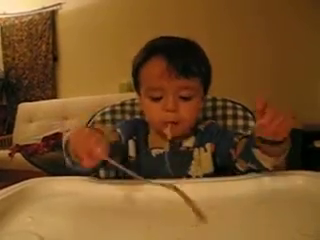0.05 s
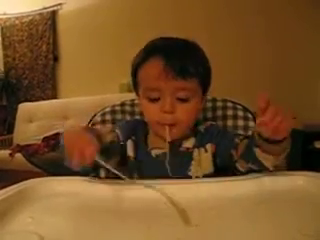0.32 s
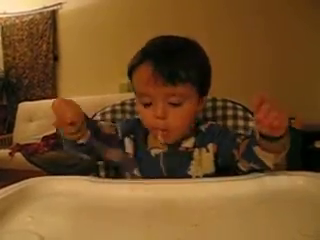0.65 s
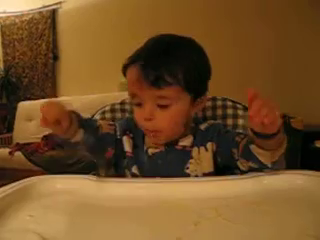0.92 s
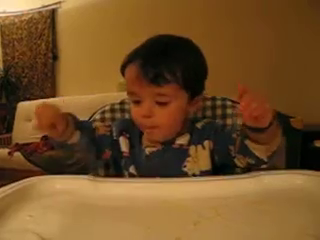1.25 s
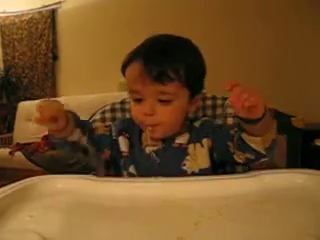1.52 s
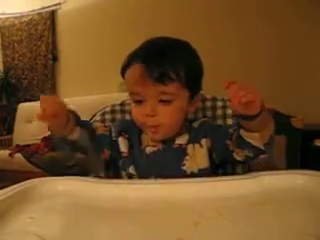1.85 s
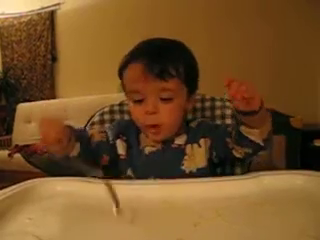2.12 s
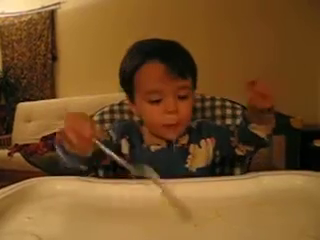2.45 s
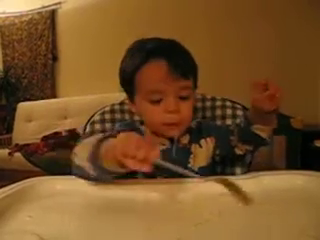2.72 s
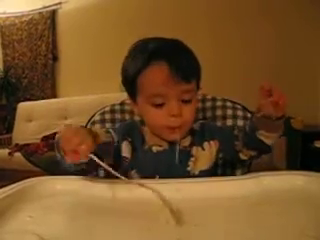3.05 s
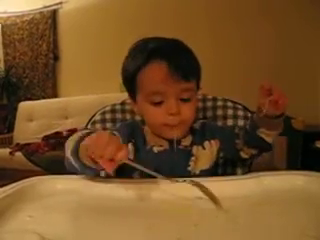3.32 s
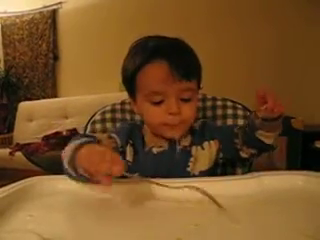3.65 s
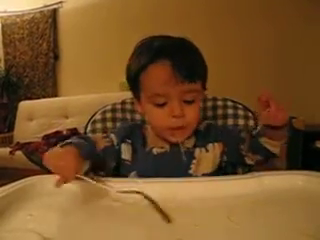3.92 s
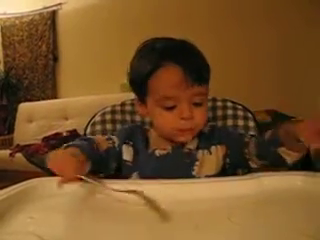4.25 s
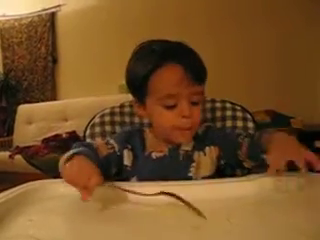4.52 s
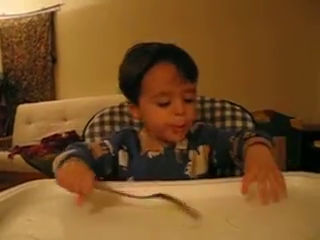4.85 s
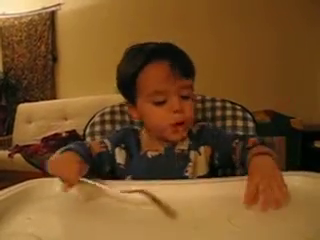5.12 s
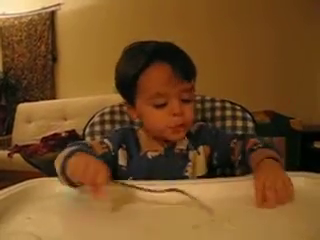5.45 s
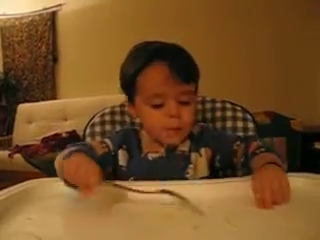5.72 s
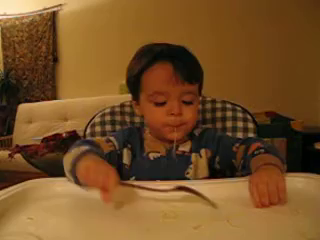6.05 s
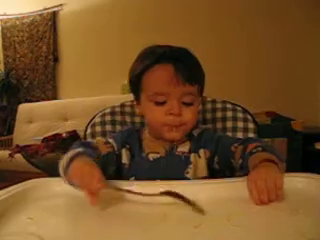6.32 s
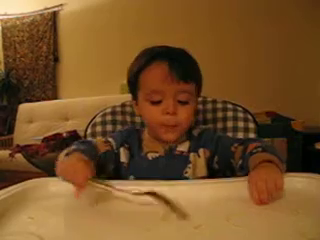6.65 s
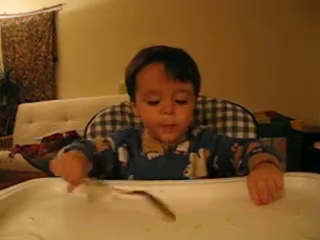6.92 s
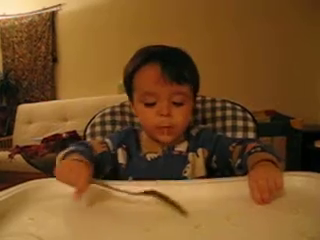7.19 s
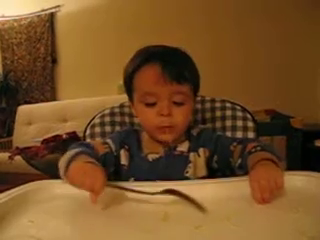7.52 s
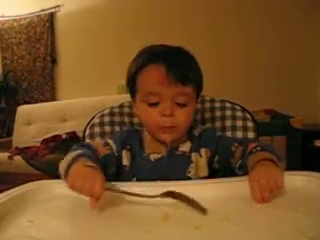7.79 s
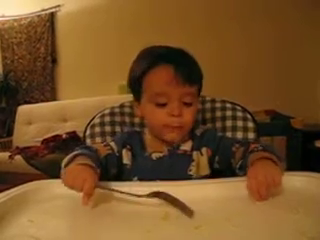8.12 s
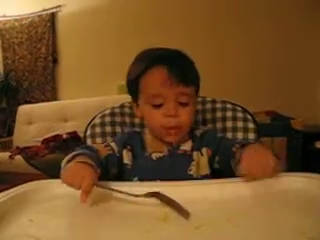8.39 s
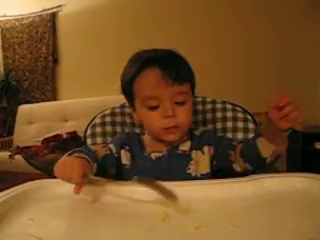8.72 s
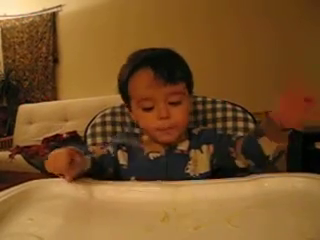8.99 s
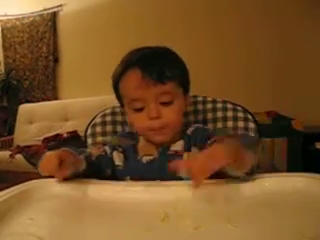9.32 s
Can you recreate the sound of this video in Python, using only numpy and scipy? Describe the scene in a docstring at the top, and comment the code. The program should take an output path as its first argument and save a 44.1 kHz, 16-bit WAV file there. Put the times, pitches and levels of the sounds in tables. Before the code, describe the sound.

A small child bangs a metal fork on a plastic high-chair tray seven times. Each sharp slap overloads the close microphone and leaves a brief hollow ring. The fork then scrubs back and forth more quietly, its tines grating, snagging and clicking on the plastic. The scraping peters out and a few light ticks follow, over faint living-room rumble and hiss.

```python
"""Over living-room rumble and a camera's hiss and faint whine, a small child bangs a metal fork
on a plastic high-chair tray seven times. The slaps overload the near camera; tray and room ring on.
The fork bounces with a click just after some blows, and small ticks and pops fall in between.
From 2.6 s the fork scrubs to and fro: the tines grate and snag, and their slips ring fork and tray.
The scrubbing peters out by 8.4 s, and a few last ticks follow."""
import sys
import numpy as np
from scipy import signal
from scipy.fft import rfft, irfft
from scipy.io import wavfile

SR = 44100
rng = np.random.default_rng(int(sys.argv[2]) if len(sys.argv) > 2 else 0)


def store_pcm(level_fs):
    """Save levels as 16-bit WAV."""
    pcm = np.round(np.clip(level_fs, -1, 1) * 32767).astype(np.int16)
    wavfile.write(sys.argv[1], SR, np.atleast_2d(pcm).T)


N = 412764

# resonances of the plastic under the tines: f/Hz, level/dB, t60/s
PLASTIC_MODES = [(382, -4.5, 0.059), (604, -5, 0.015), (1164.5, -1.5, 0.053), (1337, -4.5, 0.062),
                 (1518, 6.5, 0.02)]


def amp(db):
    """Decibels to gain."""
    return 10 ** (np.asarray(db) / 20)


def unit_rms(x):
    """Scales to rms 1."""
    return x / np.sqrt(np.mean(x ** 2) + 1e-20)


def seconds(size):
    """A time axis."""
    return np.arange(size) / SR


def curve_at(points, hz):
    """Reads a curve on a log-frequency axis."""
    f, value = np.transpose(points)
    return np.interp(np.log(hz + 1), np.log(f + 1), value)


def add(mix, s, sound):
    """Mixes a sound in at time s."""
    part = mix[round(s * SR):][:len(sound)]
    part += sound[:len(part)]


def band(x, lo_hz, hi_hz):
    """Causal band-pass."""
    return signal.sosfilt(signal.butter(3, [lo_hz, hi_hz], "band", fs=SR, output="sos"), x)


def coloured(x, spectrum):
    """Equalises x with a curve of f/Hz, gain/dB."""
    gain = amp(curve_at(spectrum, np.fft.rfftfreq(len(x), 1 / SR)))
    return irfft(rfft(x) * gain, len(x))


def struck(modes, size):
    """Damped modes after one blow."""
    t = seconds(size)
    return sum(amp(db - 60 * t / t60) * np.sin(2 * np.pi * hz * t) for hz, db, t60 in modes)


def resonate(x, modes):
    """Drives modes with x; a small part radiates little below its lowest mode."""
    lowest_hz = min(mode[0] for mode in modes)
    response = band(struck(modes, size=3000), .75 * lowest_hz, 8000)
    return signal.fftconvolve(x, response / np.linalg.norm(response))[:len(x)]


def background(floor_db=-51):
    """The bed: low room rumble, even microphone hiss and the camera's thin whine."""
    # rumble and hiss: f/Hz, relative density/dB
    floor_spectrum = [(15, -18), (45, 3), (85, -14.5), (120, -2), (150, -12), (230, -7.5), (330, -13),
                      (550, -11), (1000, -16), (5200, -18.5), (6000, -27)]
    # tones of the whine: f/Hz, rms level/dB
    whine_tones = [(5233, -59.5), (5791, -65.5)]
    whine = sum(amp(db) * np.sqrt(2) * np.sin(2 * np.pi * hz * seconds(N)) for hz, db in whine_tones)
    noise = coloured(rng.standard_normal(N), floor_spectrum)
    noise = signal.oaconvolve(noise, signal.firwin(101, 6250, fs=SR), "same")
    return amp(floor_db) * unit_rms(noise) + whine


def slap(peak_db, tilt_db, spread_db=2):
    """The attack of a blow; tines landing point first sound brighter than landing flat."""
    # tines hitting plastic: f/Hz, level/dB, t60/s
    slap_modes = [(338, -3, 0.037), (635, 6, 0.027), (930, -11.5, 0.0042), (1240, -2, .008),
                  (1800, 10.5, 0.0073), (2063, -3, 0.025), (2730, -17, 0.0074), (3550, 4.5, 0.0061),
                  (4220, -4, 0.0083), (5280, 0, 0.0033)]
    modes = []
    for hz, db, t60 in slap_modes:
        detuned_hz = hz * rng.uniform(0.92, 1.056)
        tilted_db = db + tilt_db * np.log2(hz) + spread_db * rng.uniform(-1.1, 1)
        modes.append((detuned_hz, tilted_db, t60))
    sound = struck(modes, size=2000)
    return amp(peak_db) * sound / sound.max()


def room_decay(x):
    """Lets each band die away at the room's rate."""
    # reverb time of the living room: f/Hz, t60/s
    reverb_times = [(80, 0.43), (300, 0.47), (900, 0.43), (2200, 0.42), (5000, 0.49)]
    hz, t, spectra = signal.stft(x, SR, nperseg=256)
    decay = amp(-60 * t / curve_at(reverb_times, hz)[:, None])
    return signal.istft(spectra * decay, SR, nperseg=256)[1][:len(x)]


def bangs(modes_db=-2, scatter_db=2, swell_s=0.00067, near_db=-6, near_s=0.048,
          spreading_s=.0012, echo_s=0.013, echo_db=-14):
    """Each blow slaps the plastic; then the hollow tray and the room ring on."""
    # the blows: t/s, slap peak/dB, slap tilt/(dB per octave), boom/dB, clatter/dB, rattle/dB
    blows = [(0.084, 5, 3.5, -20.5, -20.5, -27.5), (0.3812, 7, 3, -20, -21.5, -27),
             (1.0675, 1, -1.5, -24.5, -27.5, -33), (1.3981, 0, -4, -24, -25.5, -30.5),
             (1.7338, 2.5, 1.5, -23, -25.5, -29.5), (2.09, 2.5, 2.5, -19.5, -24.5, -27),
             (2.5538, -1, -1, -26.5, -30.5, -38)]
    # long modes of the tray, then of the fork as it lifts off: f/Hz, level/dB
    long_modes = [(67, -0.5), (104, -1), (152, 2), (222, 1), (266, -5), (295, -2), (358, -2.5), (404, 4),
                  (437, -14.5), (493, -3.5), (549, -12.5), (615, -7), (658, -2), (852, -7), (912, -12.5),
                  (1876, -17), (2050, -14), (2595, -25.5), (2715, -24.5)]
    # dense ring of tray and room: f/Hz, relative density/dB
    ring_spectrum = [(45, -18), (100, 4.5), (300, 8.5), (600, 3), (740, -0.5), (860, 3.5), (1200, -5),
                     (1500, -7.5), (1950, -4.5), (2300, -17), (2700, -16.5), (3600, -23), (4400, -30.5),
                     (5600, -38.5)]
    out, t = np.zeros(N), seconds(size=30000)
    early = t < .08
    hz, db = np.transpose(long_modes)
    for s, slap_db, tilt_db, boom_db, clatter_db, rattle_db in blows:
        # the spot that is hit decides how strongly each mode answers; the fork's weight detunes it
        gains = amp(db + scatter_db * rng.standard_normal(len(hz)))
        phases = rng.random((len(hz), 1))
        loaded_hz = hz * rng.uniform(.992, 1.008, len(hz))
        modes = unit_rms(gains @ np.sin(2 * np.pi * (loaded_hz[:, None] * t + phases)))
        dense = unit_rms(coloured(rng.standard_normal(len(t)), ring_spectrum))
        # the tray close by is loudest at first, then the room takes over
        envelope = (1 - np.exp(-t / swell_s)) * (1 + amp(near_db) * np.exp(-t / near_s))
        ring = room_decay(dense + amp(modes_db) * modes) * envelope
        for level_db, lo_hz, hi_hz in (boom_db, 45, 700), (clatter_db, 700, 2300), (rattle_db, 2300, 6500):
            part = band(ring, lo_hz, hi_hz)
            add(out, s + spreading_s, amp(level_db) * part / part[early].std())
        add(out, s, slap(slap_db, tilt_db))
        add(out, s + echo_s, slap(slap_db + echo_db, tilt_db))  # the near wall answers
    return out


def click(peak_db, knock_db, edge_db=-6, scatter_db=2, snap_s=.002, chirp_s=0.0012, chirp_hz=1880):
    """A bounce or a snag: a chirp of the fork, a knock in the plastic and a sharp edge."""
    t = seconds(size=2000)
    burst = rng.standard_normal(len(t)) * np.exp(-t / snap_s) * (1 - np.exp(-t / chirp_s))
    chirp = t * np.exp(-t / chirp_s) * np.sin(2 * np.pi * chirp_hz * rng.uniform(0.99, 1.042) * t)
    knock = amp(knock_db) * unit_rms(resonate(burst, PLASTIC_MODES))
    edge_gain = amp(knock_db + edge_db + scatter_db * rng.standard_normal())  # grows with the knock
    edge = edge_gain * unit_rms(band(burst, 2000, 4900))
    sound = unit_rms(chirp) + knock + edge
    return amp(peak_db) * sound / abs(sound).max()


def bounces_and_snags(release_s=0.00098):
    """The fork bounces just after some blows; in the scrubbing the tines stick and let go."""
    # three bounces after blows, then the hardest snags of the scrubbing:
    # t/s, peak/dB, knock relative to chirp/dB
    clicks = [(0.125, -11, -8), (2.146, -14, 10), (2.606, -13.5, -6), (2.882, -23, -10), (2.932, -23, -9.5),
              (3.207, -17.5, -9), (3.262, -22.5, -7), (3.691, -20, -8), (4.007, -17.5, -17),
              (4.055, -20, -24), (4.072, -16.5, -27), (4.278, -19, -14), (4.341, -19, -9.5),
              (4.497, -16.5, -3.5), (4.649, -24.5, -10.5), (4.695, -19, -8.5), (4.745, -16.5, -7.5),
              (4.792, -16, -12.5), (4.876, -14, -9.5), (4.897, -14, -10), (5.239, -16.5, -10),
              (5.284, -22, -4), (5.642, -14.5, -0.5), (5.716, -26.5, 0), (5.85, -16, -6.5),
              (5.925, -21.5, -13), (6.013, -21.5, 4), (6.039, -21.5, -1), (6.135, -22, -5.5),
              (6.347, -15.5, -1), (6.693, -17.5, -6), (6.743, -17, -12), (6.947, -17, -3),
              (7.046, -15, -10.5), (7.072, -19.5, -4), (7.226, -19.5, 0), (7.371, -14, -15.5),
              (7.467, -20.5, -9.5), (7.62, -20, 5), (7.67, -20, -16)]
    out = np.zeros(N)
    for s, peak_db, knock_db in clicks:
        add(out, s + release_s, click(peak_db, knock_db))
    for s, peak_db in stroke_events(share=.85, base_db=-24):  # lighter snags
        add(out, s, click(peak_db, knock_db=-9))
    return out


def tick(peak_db, hz, t60, noise_db, rise_s=0.00027):
    """A light touch: one short resonance with a puff of noise."""
    t = seconds(size=3000)
    puff = unit_rms(band(rng.standard_normal(len(t)), 490, max(2600, 1.2 * hz)))
    envelope = amp(-60 * t / t60) * (1 - np.exp(-t / rise_s))
    sound = (np.sin(2 * np.pi * hz * t) + amp(noise_db) * puff) * envelope
    return amp(peak_db) * sound / abs(sound).max()


def ticks(t60_at_1khz=0.032, bump_hz=(342, 486)):
    """Light touches of the fork, and dull bumps of the tray now and then as it is scrubbed."""
    # ticks and pops of fork and tray: t/s, peak/dB, f/Hz, noise/dB
    touches = [(.641, -27, 590, -6.5), (0.792, -29, 835, 5), (1.257, -22, 321, -28),
               (2.007, -16.5, 4220, -1.5), (2.015, -19, 1128, -6.5), (2.039, -21, 3950, 1.5),
               (2.365, -29.5, 624, -3.5), (2.458, -29.5, 1180, -8), (2.502, -27, 1170, -17),
               (3.192, -16, 1120, -14), (3.199, -23, 770, -7.5), (3.385, -17.5, 4200, -9),
               (3.508, -27.5, 562, -8), (3.581, -29.5, 717, -2.5), (3.775, -24.5, 1120, -15),
               (3.795, -30.5, 373, -17), (3.935, -27, 4780, 1.5), (5.079, -27.5, 426, -11),
               (6.844, -32, 605, -8), (7.274, -20.5, 5150, 2), (8.51, -28.5, 1080, -8),
               (8.518, -19, 4120, 6), (9.216, -30, 657, -10)]
    out = np.zeros(N)
    for s, peak_db, hz, noise_db in touches:
        t60 = t60_at_1khz / (hz / 1000) ** 0.34  # higher ticks die sooner
        add(out, s, tick(peak_db, hz, t60, noise_db))
    for s, peak_db in stroke_events(share=.35, base_db=-33):
        add(out, s, tick(peak_db, rng.uniform(*bump_hz), t60=.055, noise_db=-17))
    return out


def strokes(overlap_s=.006):
    """One row a stroke: start, end and the gesture at its middle."""
    # the hand reverses about five times a second: t/s
    turns = [2.569, 2.795, 3.135, 3.36, 3.555, 3.748, 3.971, 4.177, 4.392, 4.618, 4.817, 5.04, 5.215, 5.418,
             5.655, 5.897, 6.088, 6.292, 6.469, 6.673, 6.83, 7.01, 7.162, 7.334, 7.527, 7.732, 7.89, 8.075,
             8.23, 8.36]
    # the scrubbing builds, holds and peters out, moving onto looser plastic that answers more:
    # t/s, pressure/dB, top speed/dB, answer of the plastic/dB, its note/Hz
    gesture = [(2.67, -9.5, 1.5, -10, 1030), (3.0, -1.5, -2, -3, 1080), (3.62, -5, -4, 2.5, 1065),
               (3.86, -2, -1, 1.5, 1197), (4.5, 1.5, -2.5, -3, 1153), (4.72, -1.5, -2, 3, 1530),
               (4.92, 0.5, 0, -1, 1520), (5.14, -2.5, 1, 6, 1276), (5.32, -2.5, 2, 4, 1200),
               (5.54, -7.5, .5, 9, 1157), (5.8, 0, 0, 1, 1223), (6.201, -2, 2, 2, 1186),
               (6.58, -1, 0.5, 4.5, 1340), (6.75, 0, 0.5, 3.5, 1580), (6.92, 0.5, -0.5, 2, 1310),
               (7.22, -1, -2.5, -2, 1310), (7.42, .5, -1, 3, 1556), (7.8, 0, -0.5, 0.5, 1586),
               (7.98, -2.5, -2, -4, 1204), (8.15, -6.5, -11, 2.5, 1530), (8.31, -18, -12, 1, 1580)]
    # the tines do not all turn at once, so strokes overlap
    start, end = np.array(turns[:-1]) - overlap_s, np.array(turns[1:]) + overlap_s
    s, *controls = np.transpose(gesture)
    at_middle = [np.interp((start + end) / 2, s, control) for control in controls]
    return np.column_stack([start, end] + at_middle)


def stroke_events(share, base_db, scatter_db=2):
    """Chance hits (t/s, peak/dB) in the middle half of some strokes, louder under more pressure."""
    start, end, press_db = strokes().T[:3]
    chance, where = rng.random((len(start), 2)).T
    s = (start + end) / 2 + (end - start) * (where - .5) / 2
    peak_db = base_db + press_db + scatter_db * rng.standard_normal(len(s))
    return np.column_stack([s, peak_db])[chance < share]


def chatter(t, depth_db, per_s):
    """Uneven contact: a gain that jumps about at random."""
    marks = np.arange(0, t[-1] + 1 / per_s, 1 / per_s)
    return unit_rms(amp(depth_db * np.interp(t, marks, rng.standard_normal(len(marks)))))


def grit(size, per_s, spread_db):
    """Tiny slips at random moments, a few much larger than the rest."""
    slipping = rng.random(size) < per_s / SR
    height = amp(spread_db * np.minimum(rng.exponential(1, size), 4))
    return unit_rms(slipping * rng.choice([-1, 1], size) * height)


def varispeed(x, ratio):
    """Plays x at a changing speed."""
    return np.interp(np.cumsum(ratio) / SR, seconds(len(x)), x)


def scrubbing(fork_db=-36, plastic_db=-42.5, spot_db=-44.5, hollow_db=-53, hiss_db=-39.5, tine_db=-48,
              spot_t60=0.031, tine_t60=.011, tine_hz=(3150, 4980), ease_db=2, stall=0.16,
              grip_detune=0.0074, bend=0.02598, rim_s=0.001629, ring_echo=0.26):
    """The fork speeds up and stops in each stroke; its slips ring fork and tray, and hiss most when fast."""
    # the fork pressed on the tray: f/Hz, level/dB, t60/s
    fork_modes = [(1510, -8.5, 0.0028), (1820, -4, 0.026), (1930, -1.5, 0.035), (2090, -20.5, 0.15)]
    # the hollow under the tray, damped by hand and fork: f/Hz, level/dB, t60/s
    hollow_modes = [(66, 1, 0.074), (121, -4.5, 0.16), (172, -4, 0.031), (195, 0, 0.051)]
    # grating of the tine tips: f/Hz, relative density/dB
    grating_spectrum = [(1500, 5.5), (2400, 5), (2800, 5), (3200, 8.5), (3800, 7.5), (4270, 9), (4600, -1),
                        (4870, 10.5), (5300, 0), (5900, -0.5)]
    out = np.zeros(N)
    for k, (start, end, press_db, speed_db, answer_db, spot_hz) in enumerate(strokes()):
        t = seconds(round((end - start) * SR) + SR // 20)
        along = np.minimum(t / (end - start), 1)
        swing = np.pi * along ** 1.12  # top speed comes a little after the middle
        speed = ((np.sin(swing) - stall) / (1 - stall)).clip(0)  # the tines stick at each turn
        place = -(-1) ** k * np.cos(swing)  # out with rising pitch, back with falling pitch
        bite = chatter(t, depth_db=3, per_s=150)
        slips = grit(len(t), per_s=1000, spread_db=3.5) * bite
        fine_slips = grit(len(t), per_s=5000, spread_db=5.5) * bite
        judder = chatter(t, depth_db=3, per_s=45)  # the loose grip makes the ring come in bursts
        easing = amp(ease_db * (.5 - along))  # the tines bite hardest as they set off
        drive = speed ** 0.53 * easing * judder
        push = unit_rms(fine_slips + slips) * drive
        tuning = 1 + grip_detune * rng.standard_normal()  # the grip retunes the fork each stroke
        gripped_modes = [(hz * tuning, db, t60) for hz, db, t60 in fork_modes]
        fork = amp(fork_db) * resonate(slips * drive, gripped_modes)
        plastic = amp(plastic_db) * resonate(push, PLASTIC_MODES)
        plastic += amp(spot_db) * resonate(push, [(spot_hz, 0, spot_t60)])  # each spot favours a note
        hollow = amp(hollow_db) * resonate(push, hollow_modes)
        # the wave that returns from the rim combs the sound; its delay follows the fork
        echo_t = t - rim_s * (rng.uniform(0.698, 1.277) + .1 * place)
        hiss = band(coloured(fine_slips + .5 * slips, grating_spectrum), 1200, 7900)
        hiss = unit_rms(hiss + np.interp(echo_t, t, hiss))
        tines = resonate(fine_slips, [(rng.uniform(*tine_hz), 0, tine_t60)])
        grating = (amp(hiss_db) * hiss + amp(tine_db) * tines) * (amp(speed_db) * speed) ** 1.7
        ring = fork + hollow + amp(answer_db) * plastic
        ring = (ring + ring_echo * np.interp(echo_t, t, ring)) / np.hypot(1, ring_echo)
        ring = varispeed(ring, 1 + bend * place)  # the pitch bends as the contact point travels
        add(out, start, amp(press_db) * (ring + grating))
    return out


def room(x, wet_db=-10, predelay_s=0.006):
    """Adds the soft tail of the living room."""
    t = seconds(size=24000)
    tail = room_decay(rng.standard_normal(len(t))) * (t > predelay_s)
    return x + amp(wet_db) * signal.oaconvolve(x, tail / np.linalg.norm(tail))[:N]


def scene():
    """The mono mix at the microphone; the bangs carry their own room tail."""
    return (bangs() + room(scrubbing() + bounces_and_snags() + ticks()) + background())[None]


def record(dry, headroom=0.96, ceiling=0.76, band_hz=5750, top_hz=16600):
    """A narrow-band camera: its input rounds off the bangs, and its output clips what still overshoots."""
    rounded = headroom * np.tanh(dry / headroom)
    input_lowpass = signal.firwin(161, band_hz, window=("kaiser", 8), fs=SR)
    narrow = signal.oaconvolve(rounded, input_lowpass[None], "same")
    clipped = np.clip(narrow, -ceiling, ceiling)
    output_lowpass = signal.firwin(511, top_hz, window=("kaiser", 9), fs=SR)
    return signal.oaconvolve(clipped, output_lowpass[None], "same")


dry = scene()
out = record(dry)
store_pcm(out)
```